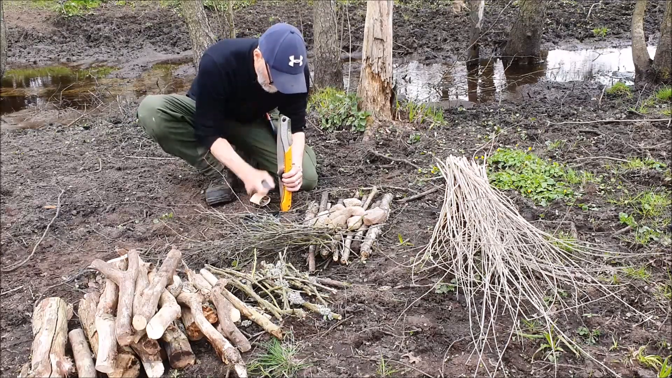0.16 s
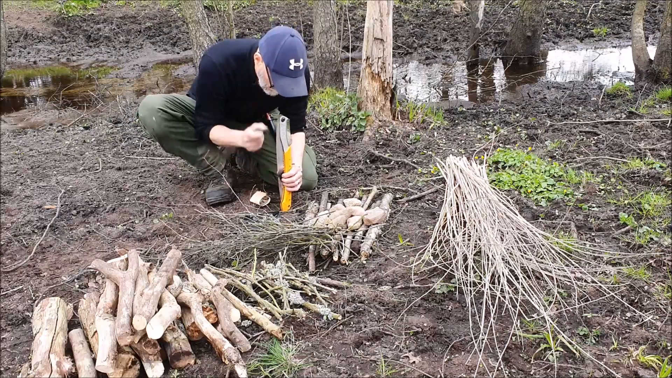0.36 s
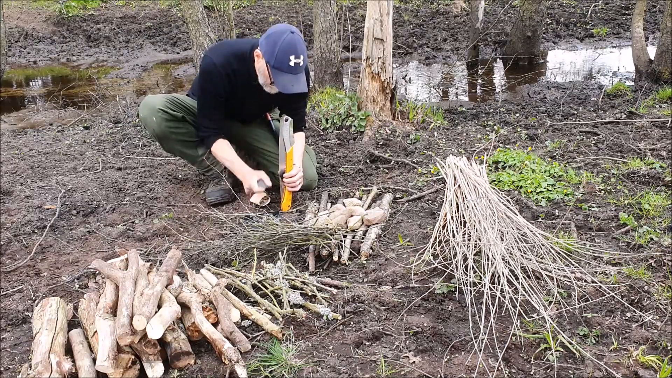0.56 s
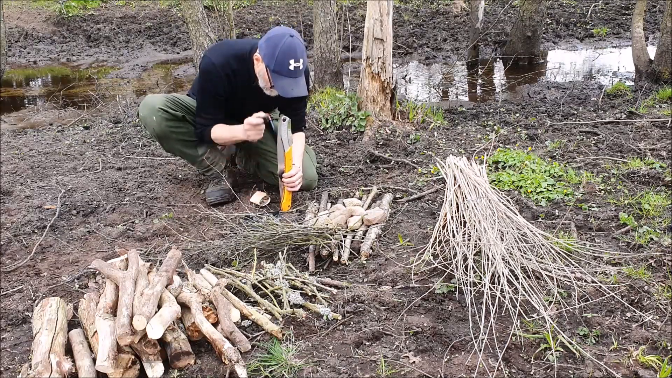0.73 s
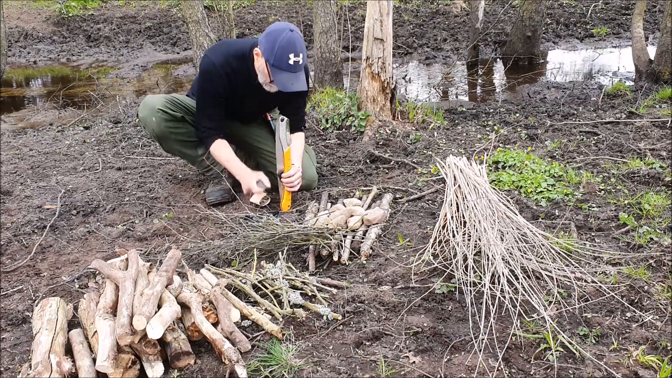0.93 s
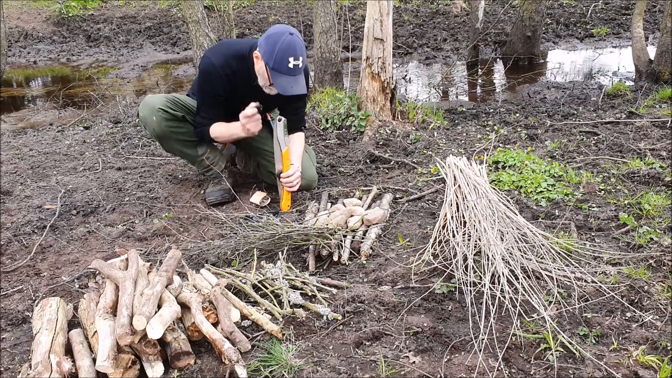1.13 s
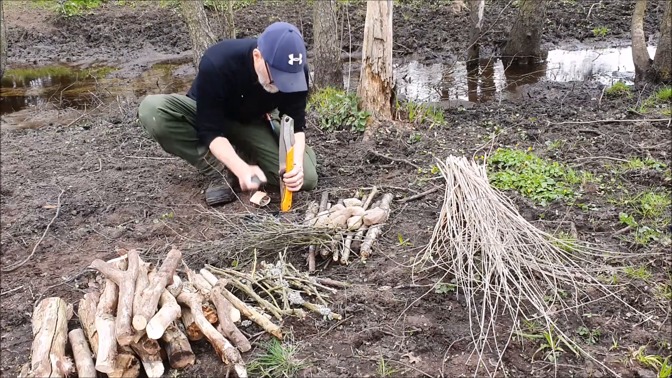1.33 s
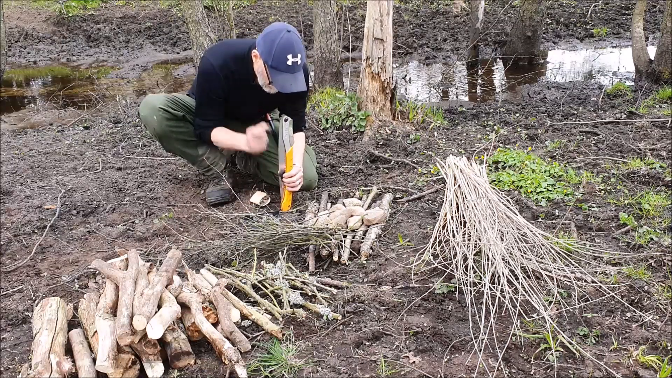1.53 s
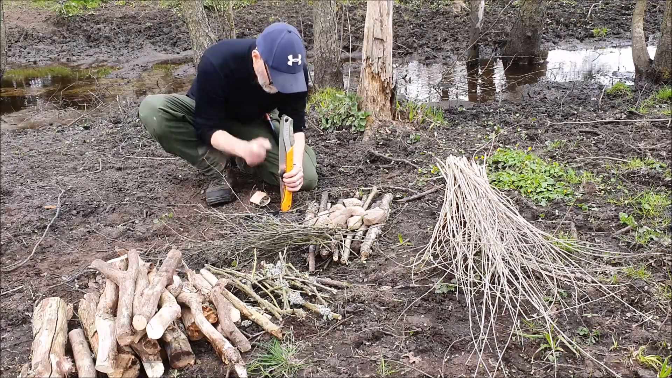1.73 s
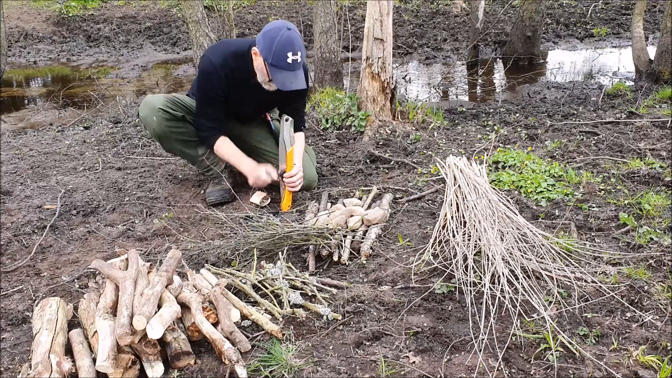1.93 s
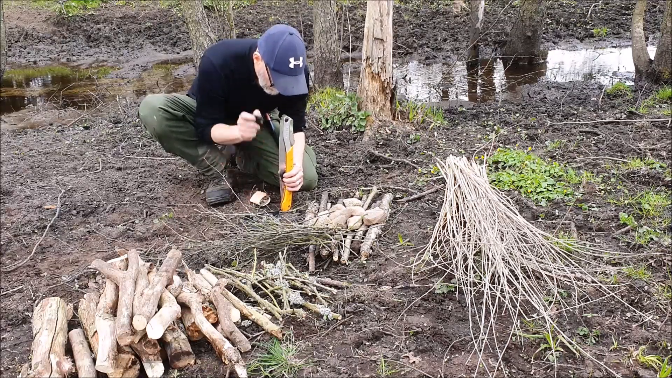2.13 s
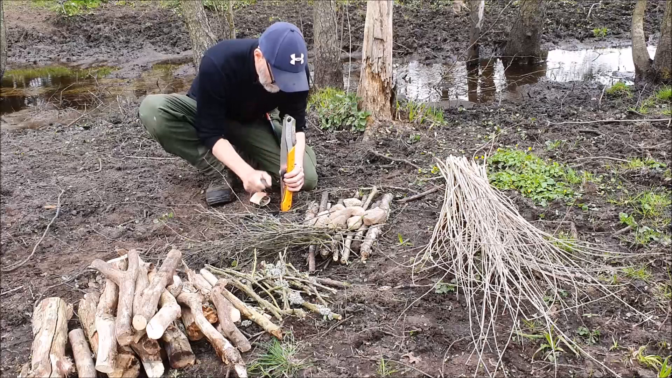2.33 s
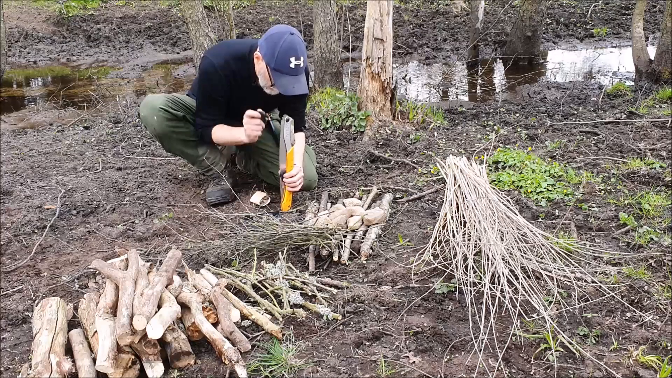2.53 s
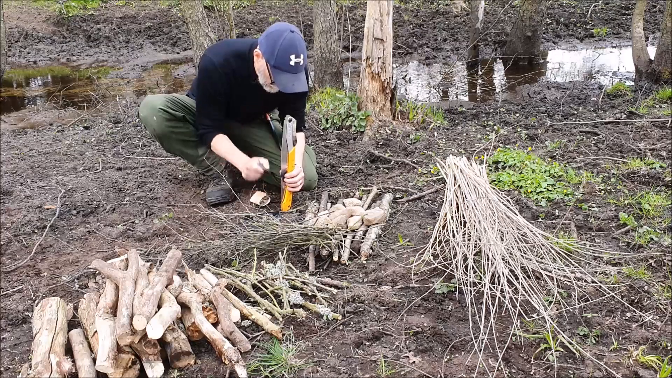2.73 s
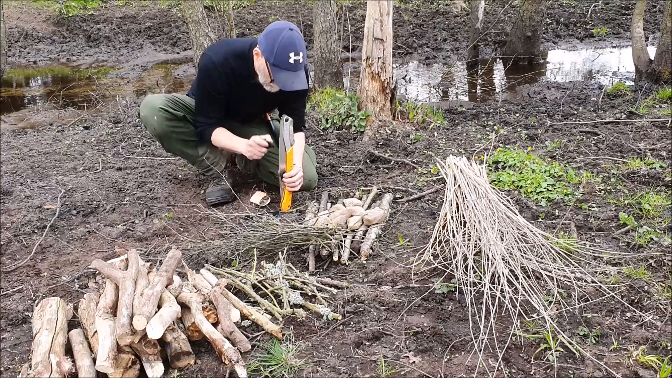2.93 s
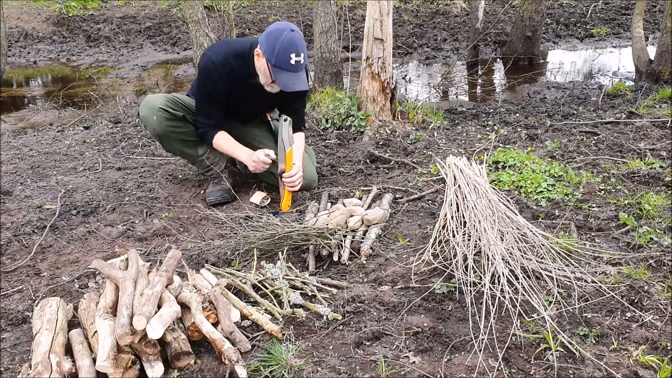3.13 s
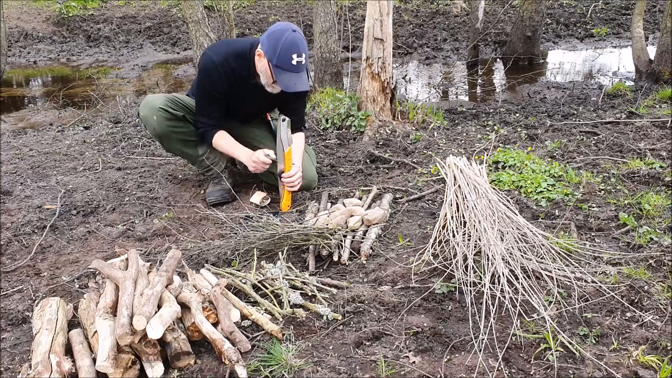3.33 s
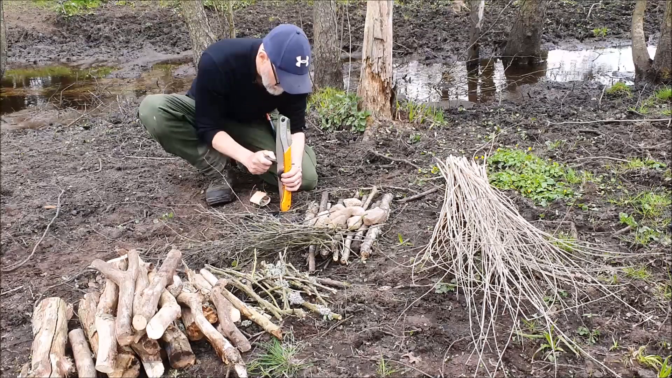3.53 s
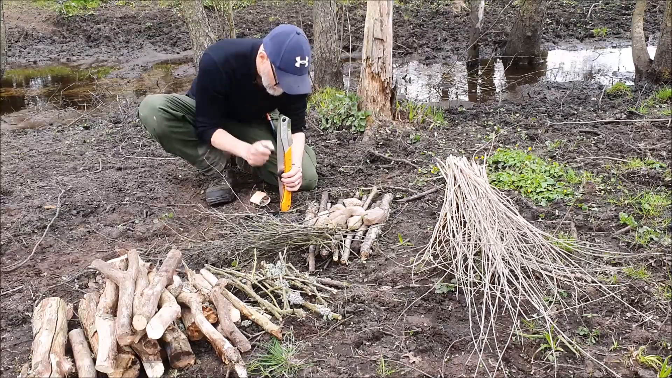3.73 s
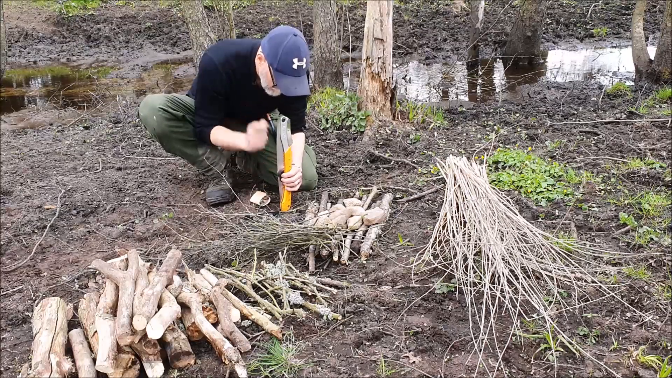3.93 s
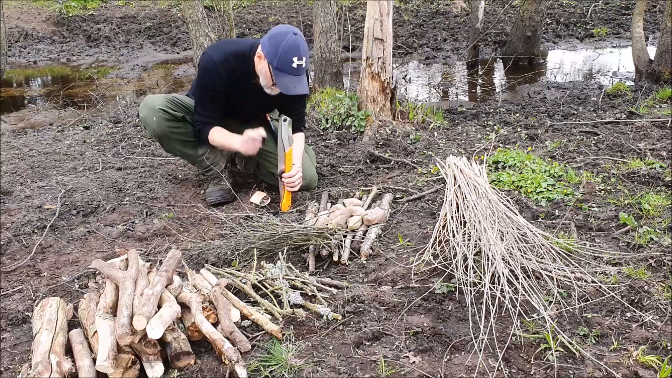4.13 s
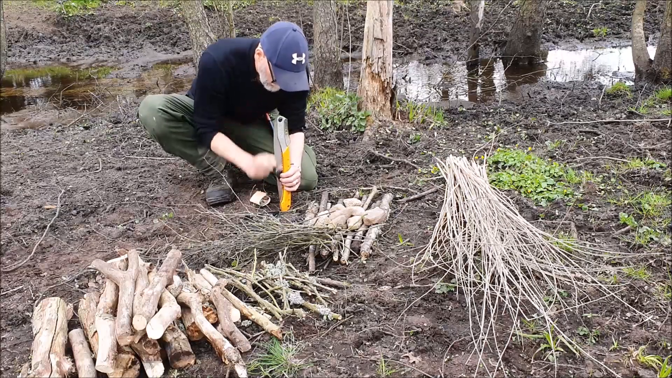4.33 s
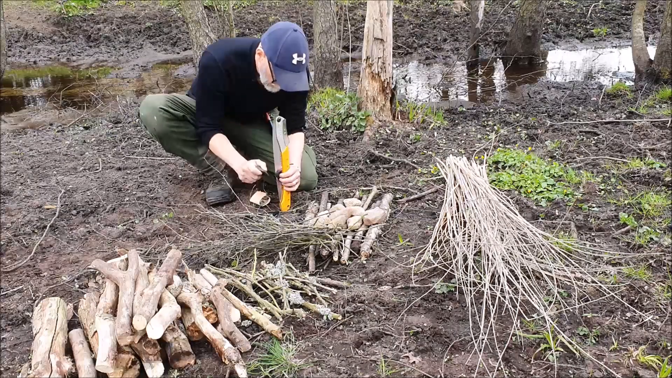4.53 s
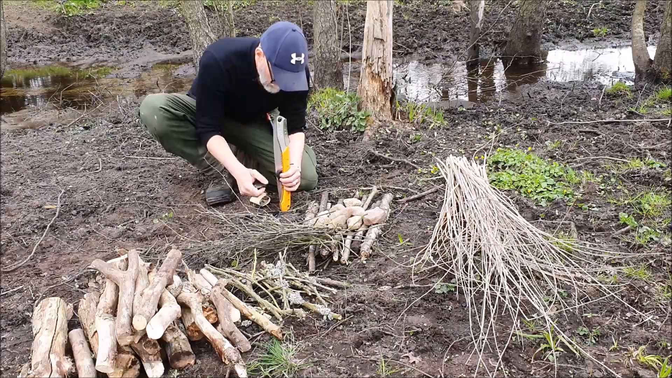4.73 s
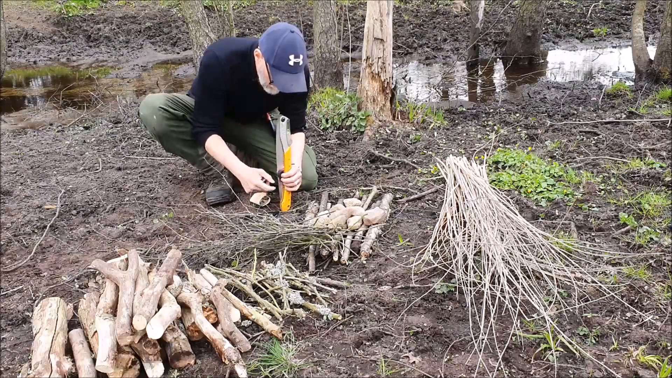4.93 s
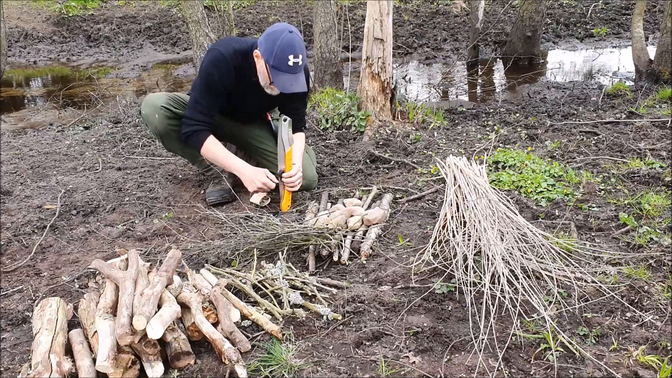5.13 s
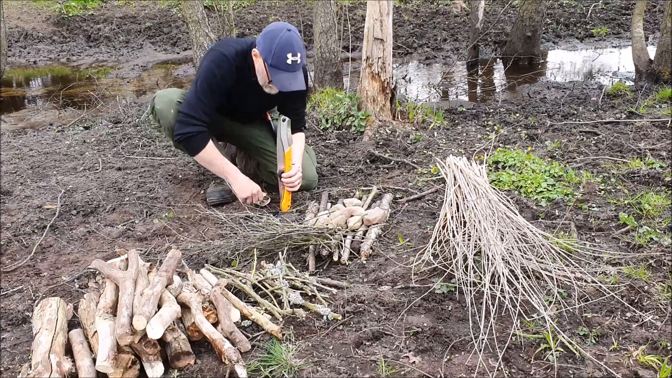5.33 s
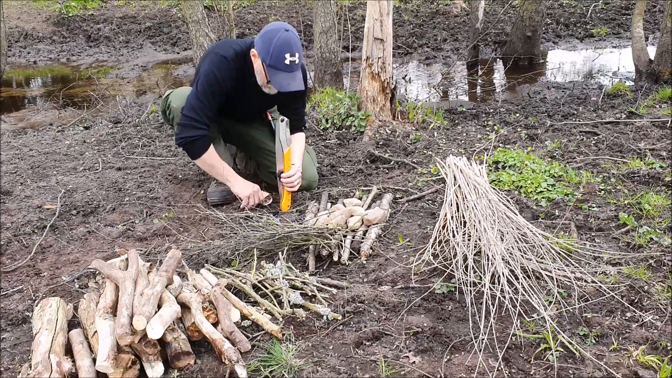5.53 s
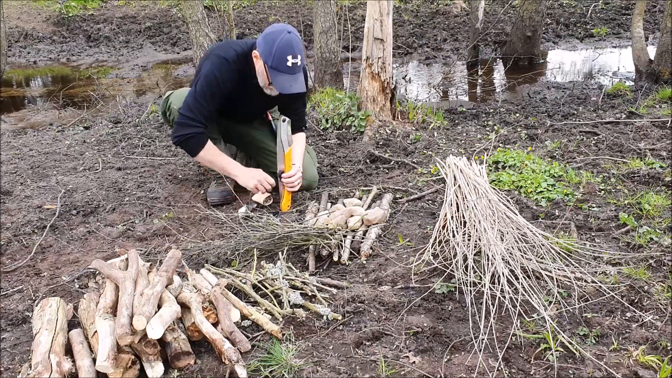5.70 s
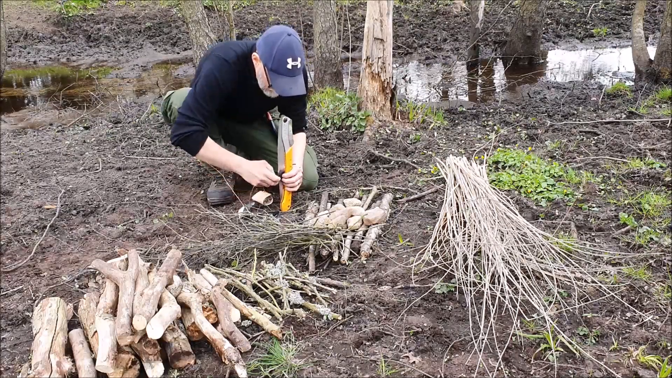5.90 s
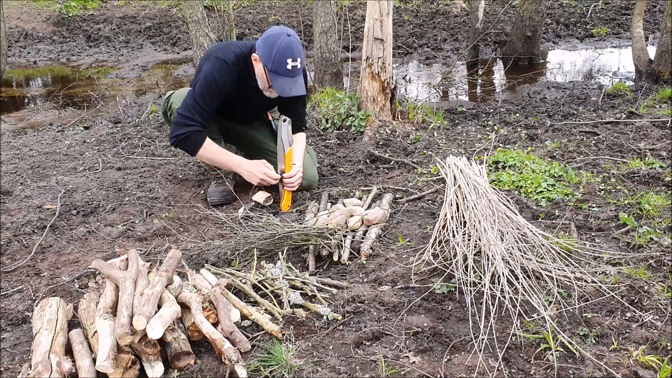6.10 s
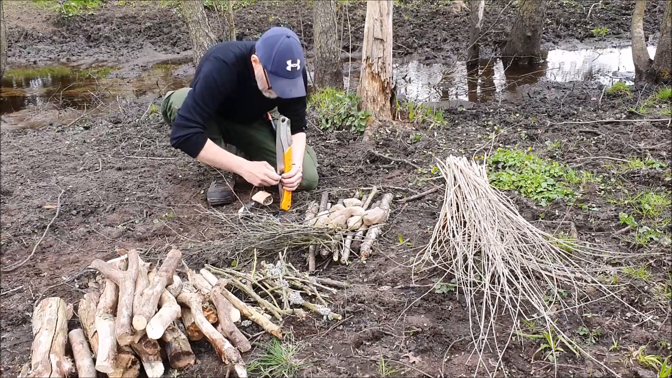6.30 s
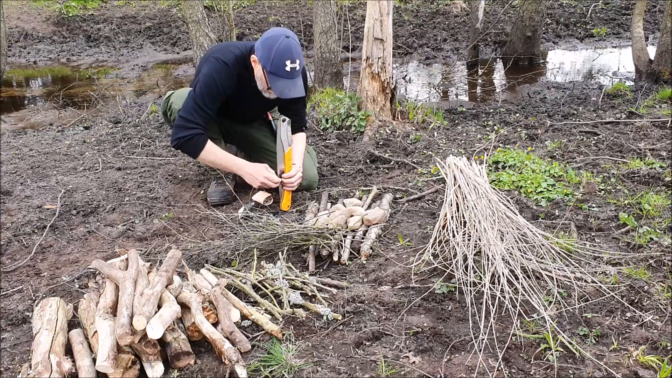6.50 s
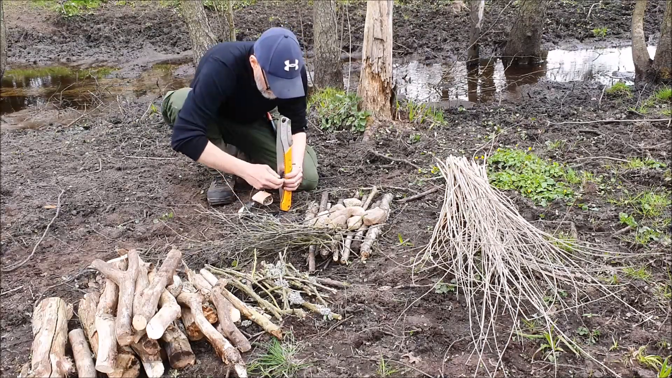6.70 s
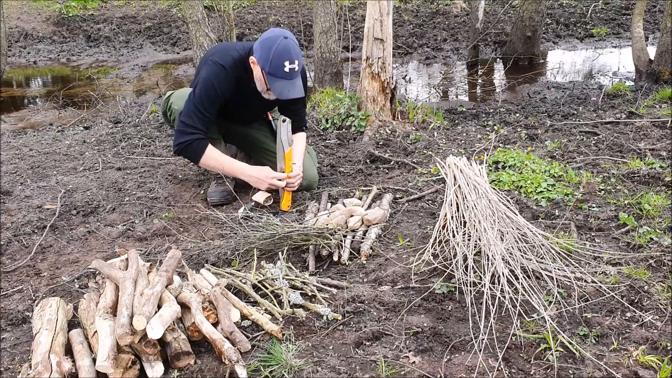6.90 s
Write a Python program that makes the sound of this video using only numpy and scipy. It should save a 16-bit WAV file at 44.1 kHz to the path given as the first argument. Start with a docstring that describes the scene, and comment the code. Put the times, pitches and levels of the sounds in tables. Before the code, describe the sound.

Close by in a wet wood, a flint is struck down a steel blade in nine short, gritty, bright scrapes, roughly three per second, each with a brief metallic ring. After a pause come two weaker strokes. A bird repeats faint rising notes early, distant birds flutter midway, and a whistle dips and climbs twice near the end. Low rumble and distant traffic hush lie beneath, picked up by a small stereo camera a couple of metres away.

```python
"""A flint is struck down a steel blade, a couple of metres from a small stereo camera in a wet wood.
Nine gritty scrapes of filtered noise come first and two more after four seconds, each setting steel
modes (decaying sines) ringing. Trunks scatter them as noise tails. A bird repeats a rising note early on,
far birds flutter mostly midway, and a whistle dips and climbs twice near the end, all as bent sines.
Stray notes and ticks fall between; a low rumble and the hush of distant traffic, both noise, lie under all."""
import sys
import numpy as np
from scipy import signal
from scipy.fft import rfft, irfft
from scipy.io import wavfile
from scipy.ndimage import uniform_filter1d

SR = 44100
rng = np.random.default_rng(int(sys.argv[2]) if len(sys.argv) > 2 else 0)


def store_wav(level_fs):
    """Save 16-bit WAV to argv[1]."""
    pcm = np.round(np.clip(np.atleast_2d(level_fs), -1, 1) * 32767)
    wavfile.write(sys.argv[1], SR, pcm.T.astype(np.int16))


N = 311346
TIME = np.arange(N) / SR


def undb(db):
    """Turn decibels into an amplitude factor."""
    return 10 ** (np.asarray(db) / 20)


def unit(x):
    """Scale to an RMS of one."""
    return x / np.sqrt(np.mean(x ** 2))


def curve(rows):
    """Draw straight lines through rows of (time [s], values) over the whole scene."""
    s, *columns = np.transpose(rows)
    return [np.interp(TIME, s, column) for column in columns]


def colour(x, hz, db, lag=0.):
    """Filter by levels [dB] and phase lags [rad] given at a few frequencies."""
    at = np.log(np.fft.rfftfreq(x.shape[-1], 1 / SR) + 1)
    lag = np.interp(at, np.log(hz), lag + np.zeros(len(hz)))
    gain = undb(np.interp(at, np.log(hz), db))
    return irfft(rfft(x) * gain * np.exp(-1j * lag), x.shape[-1])


def band(x, lo_hz, hi_hz):
    """Pass one frequency band with gentle slopes."""
    edges = [lo_hz, min(hi_hz, SR / 2.2)]
    return signal.sosfilt(signal.butter(2, edges, "bandpass", fs=SR, output="sos"), x)


def walk(rate):
    """Wander at random: values held for 1 / rate s, then smoothed twice."""
    hold = int(SR / rate)
    steps = np.repeat(rng.standard_normal(N // hold + 1), hold)
    return 1.3 * uniform_filter1d(uniform_filter1d(steps, hold), hold)[:N]


def pan(x, db):
    """Spread a sound to two sides; db is left minus right."""
    return x * undb(np.array([db / 2, -db / 2]).reshape(2, -1))


def add(out, s, x):
    """Mix x into out from time s on."""
    i = int(s * SR)
    out[..., i:i + x.shape[-1]] += x[..., :N - i]


# strokes of the flint: (time [s], scrape level [dB], time until the stone digs deepest [ms],
#  scrape decay t60 [s], colour at 400 Hz [dB], at 1 kHz [dB], at 2 kHz [dB], at 15 kHz [dB],
#  place along the blade [about -1..1], place across it [about -1..1],
#  slant of the stone [-1..1], grip on the handle [-1..1])
STROKES = [(0.2617, -27.0, 2.1, 0.11, -5.5, 0.0, 1.5, -2.5, 0.8, 0.031, -0.77, -0.21),
           (0.602, -26, 2.1, 0.081, 3.0, 0.0, -3.5, -1.5, 0.81, 0.63, 0.95, -0.2),
           (0.9542, -26.0, 2.7, 0.075, -10.5, -4.5, 2.0, -2.5, -0.66, 0.036, -0.19, -0.74),
           (1.3338, -23.5, 1.6, 0.065, -11.5, -3.0, -0.5, 5.5, -0.047, 0.053, -0.08, 0.44),
           (1.3532, -26.0, 6.0, 0.065, -8.5, -2.5, 0.5, -3, -0.55, 0.62, -0.28, 1),
           (1.705, -30, 2.1, 0.082, 5, 2.0, -2.5, -3, -0.45, -0.046, 0.6, 0.46),
           (2.0379, -29.0, 2.1, 0.076, 5.0, 3, -3.0, -2, 0.17, -1.14, -0.07, -0.78),
           (2.382, -25.5, 3.0, 0.092, 5.5, 5.0, 0.5, -3.0, -0.12, 0.56, -0.35, -1),
           (2.7247, -22, 2.5, 0.098, 1.0, 2.0, -2.0, 6.5, 0.62, -0.89, -0.65, 0.63),
           (4.0987, -31, 4.0, 0.093, 6.5, 0.5, 4, 2.0, 0.18, 0.53, -0.17, 0.85),
           (4.4543, -30.5, 9.0, 0.082, 4.0, -1.5, 0.5, -6.0, -0.22, -0.7, 0.93, 0.22)]
# the stone's edge catches within a stroke: (time [s], level [dB], chip ring [Hz])
CATCHES = [(0.2624, -30, 4600), (0.2666, -27.5, 2070), (0.2797, -40, 6340), (0.6042, -30, 5490),
           (0.9576, -30.5, 2360), (0.9597, -35, 5410), (1.334, -35, 9580), (1.3405, -37.5, 1890),
           (1.3599, -33.5, 2526), (1.708, -28.5, 6460), (2.0408, -31.5, 4980), (2.0431, -29, 2400),
           (2.3818, -27.5, 5090), (2.3882, -33.5, 2720), (2.3997, -38, 5000), (2.7275, -23.5, 5400),
           (2.7404, -34, 2625), (4.1029, -36.5, 7070), (4.1056, -29.5, 1983), (4.4643, -35.5, 6440)]
# steel mode frequencies [Hz]
STEEL_HZ = [829, 1144, 2183, 2598, 4000, 4921, 9180, 14260, 6050, 1658, 2848, 5564, 7722, 13180, 15045,
            5222]
# the same modes: (decay t60 [s], level over the scrape [dB], left minus right [dB],
#  level of the slower twin [dB])
STEEL_MODES = [(0.94, -46, 1.5, -30), (0.25, -26, 3.5, -35.5), (0.12, -10, 4, -29),
               (0.22, -27.5, 1.5, -30.5), (.22, -25, 10.5, -23), (0.17, -26.5, 4.5, -15),
               (0.1, -19.5, 4.5, -28), (0.075, -2.5, 9.5, -48), (.12, -26, 0.5, -28), (1, -44.5, 9, -26),
               (0.81, -53, -1, -34), (0.13, -35, 4.5, -21.5), (.2, -39, 6.5, -29.5), (.15, -24, 1, -27.5),
               (.07, -22, 8.5, -31.5), (.12, -24, 5, -30)]
# how each mode answers the blow at full travel: (along [dB], across [dB], slant [dB], grip [dB])
MODE_ANSWERS = [(4.0, 2.0, 1.0, 0.0), (-1.5, 4, 6.5, -2.5), (-8.0, -0.0, -3.5, 3.0), (5.0, 0.0, 4.5, -5.0),
                (-6.0, 16.0, -2.0, 1.0), (7.0, 1.0, -11.0, -8.0), (2.0, 3.0, -7.0, 1.0),
                (16.0, 1.0, -1.0, 6.0), (4.0, 3.0, 9.0, -4.0), (-1.5, 4.0, 3.0, 0.0),
                (-1.0, 5.0, -2.0, 1.0), (5.0, 0.0, -3.0, -3.0), (-2.0, 2.0, 5.0, -2.0),
                (13.0, -1.0, 4.0, 3.0), (9.0, 9.0, -0.0, 1.0), (1.0, -2.0, -0.0, -1.0)]
# the camera body shades and delays the right port: (frequency [Hz], drop [dB], phase lag [rad])
BODY_SHADE = [(300, -2.5, 1), (960, 5.5, 0.4), (4100, 3, 1.5), (8100, 4.5, 1.5), (10840, 1, 3),
              (12660, -2.5, 0.5), (14450, 11.5, -10)]
BITE_S, SIZZLE_DB = .001, -1  # rise of the contact; scrape colour at 6 kHz
BLOW, BLOW_T60_S, GRAZE = 0.65, 0.021, 0.47  # share and decay of the hard blow; share of the first touch


def strokes():
    """Stone grains scrape the blade, heard from two sides, and drive its steel modes into ringing."""
    t = TIME[:16384]
    scrape, ring = np.zeros((2, N)), np.zeros((2, N))
    hz = np.array(STEEL_HZ)[:, None]
    t60, mode_db, pan_db, twin_db = np.transpose(STEEL_MODES)[:, :, None]
    shade_hz, _, shade_lag = np.transpose(BODY_SHADE)
    lag = np.interp(hz, shade_hz, shade_lag)
    for s, db, dig_ms, scrape_t60, thud_db, knock_db, body_db, edge_db, *place in STROKES:
        colour_db = [thud_db, knock_db, body_db, SIZZLE_DB, edge_db]
        favour_db = np.dot(MODE_ANSWERS, place)[:, None]
        noise = colour(grit(len(t), spread_db=2), [400, 1000, 2000, 6000, 15000], colour_db)
        noise = banded(noise, scatter_db=3)

        # the stone grazes, digs in hard, then drags off
        dig = dig_ms / 1000
        after = np.maximum(t - dig, 0)
        bite = 1 - np.exp(-(t / BITE_S) ** 2)
        press = GRAZE + (1 - GRAZE) * np.minimum(t / dig, 1) ** 2
        drag = (undb(-60 * after / scrape_t60) + BLOW * undb(-60 * after / BLOW_T60_S)) * press
        contact = bite * drag

        # the highest treble comes mostly from the blow and dies sooner
        top = colour(noise, [12500, 14000], [-40, 0])
        fading = noise - top + top * (undb(-60 * after / .06) + 0.2)
        burst = fading * contact
        # stroke energy follows level and contact, whatever the colour and chance grain
        add(scrape, s, burst * np.linalg.norm(contact) / np.linalg.norm(burst[0]) * undb(db))

        # the modes fill up while the stone drags, and waver in the hand
        fill = 1 - np.exp(-t / (.002 + dig))
        waver_hz = rng.uniform(15, 60, hz.shape)
        waver_db = 2 * np.sin(2 * np.pi * (waver_hz * t + rng.random(hz.shape)))
        decay = undb(-60 * t / t60) + undb(twin_db + waver_db - 26 * t / t60)
        size = fill * undb(db + mode_db + favour_db + waver_db) * decay
        turn = 2 * np.pi * (hz * t + rng.random(hz.shape))
        left = (size * np.sin(turn)).sum(0)
        right = (size * undb(-pan_db) * np.sin(turn - lag)).sum(0)
        add(ring, s, np.array([left, right]))
    for s, db, chip_hz in CATCHES:
        tone = 1.1 * np.sin(2 * np.pi * (chip_hz * t[:128] + rng.random()))
        chip = unit(grit(128, spread_db=1)) + tone
        add(scrape, s - 64 / SR, chip * undb(db) * np.hanning(128))
    return scrape, ring


# scrape colour at the left port: (frequency [Hz], level [dB])
GRIT_COLOUR = [(150, -28), (400, -19.5), (1000, -9.5), (2000, 1.5), (3500, -3.5), (5200, -0.5), (8200, -7),
               (10000, 2), (12300, -6), (13500, -6.5), (15300, 13.5), (15700, 5.5), (16000, -16.5),
               (17000, -18.5)]


def grit(size, spread_db):
    """Dense stone grains on steel, uneven in strength every 32 samples, radiate to two sides."""
    grip = np.clip(rng.standard_normal(size // 32 + 1), -1.5, 1.5)
    grains = rng.standard_normal((2, size)) * undb(spread_db * np.repeat(grip, 32)[:size])
    return colour(unit(grains), *np.transpose(GRIT_COLOUR))


# bands that lift the scrape: (centre [Hz], width [Hz], lift before chance scatter [dB])
SCRAPE_BANDS = [(1350, 200, 3.5), (2263, 180, 5), (2920, 340, 5.5), (3570, 260, 4), (4870, 190, 3),
                (5560, 760, 6), (6850, 250, 3), (7240, 150, 9.5), (7720, 140, 6.5), (8960, 300, 4.5),
                (11700, 59, 1.5), (13900, 180, 6)]


def banded(x, scatter_db):
    """Lift the scrape in fixed bands, each by its own amount in every stroke."""
    hz, width, db = np.transpose(SCRAPE_BANDS)[:, :, None]
    db = db + scatter_db * rng.standard_normal(db.shape)
    at = np.fft.rfftfreq(x.shape[-1], 1 / SR)
    lift_db = (db / (1 + (2 * (at - hz) / width) ** 2)).sum(0)
    return irfft(rfft(x) * undb(lift_db - 5), x.shape[-1])


def ports(near, aside):
    """The right port hears a nearby source shaded by the body and from a slightly other side."""
    hz, db, lag = np.transpose(BODY_SHADE)
    return np.array([near, colour(near + .45 * aside, hz, -db, lag)])


# small chips and twigs tick: (time [s], relative level [dB], centre [Hz])
TICKS = [(2.1429, -50, 11800), (2.7, -67.5, 13480), (4.1445, -52, 13600), (5.111, -74, 8980),
         (5.599, -69.5, 8920), (6.376, -66, 5580)]


def ticks():
    """Chips and twigs snap: millisecond bursts of band-passed noise."""
    out, t = np.zeros(N), TIME[:256]
    for s, db, hz in TICKS:
        snap = rng.standard_normal(256) * np.exp(-((t - .001) / 0.00061) ** 2)
        add(out, s - .001, undb(db) * 2 * band(snap, hz / 1.6, hz * 1.5))
    return out


# one bird repeats a rising note: (time [s], relative level [dB])
RISES = [(1.17, -74.5), (1.372, -75), (1.581, -72), (1.785, -73), (1.985, -78.5), (2.199, -76.5)]
# its shape: (length [s], start [Hz], middle [Hz], end [Hz], left minus right [dB])
RISE = (.092, 4900, 5620, 5950, 12)
# a quick down-and-up chip before some of the rises: (time [s], relative level [dB])
CHIPS = [(1.13, -75), (1.533, -72), (1.935, -70), (2.147, -72)]
# its shape: (length [s], start [Hz], middle [Hz], end [Hz], left minus right [dB])
CHIP = (.03, 4700, 3700, 4400, 14)
# other short notes: (time [s], length [s], start [Hz], middle [Hz], end [Hz],
#  relative level [dB], left minus right [dB])
NOTES = [(0.2, 0.05, 3600, 4050, 4000, -70.5, 7), (6.8, .25, 2320, 1600, 1900, -85, 0),
         (3.3, .1, 2330, 2280, 2000, -77.5, 3), (1.266, 0.05, 4420, 4770, 4570, -73, 15),
         (6.105, 0.044, 4100, 4210, 4070, -80.5, 16), (6.114, 0.123, 4000, 4050, 4070, -62.5, 15.5),
         (6.647, 0.084, 430, 404, 395, -75, -2), (6.892, .088, 6380, 6290, 6160, -81, -8),
         (6.964, 0.05, 7250, 7140, 6920, -85, 4)]


def notes():
    """Near-sine notes whose pitch bends through three points with a slight flutter, loudest late."""
    out = np.zeros((2, N))
    flutter = .005 * walk(300)
    calls = []
    for rows, (length, *bend_hz, pan_db) in ((RISES, RISE), (CHIPS, CHIP)):
        calls += [(s, length, *bend_hz, db, pan_db) for s, db in rows]
    for s, length, hz0, hz1, hz2, db, pan_db in calls + list(NOTES):
        u = np.arange(int(length * SR)) / (length * SR)
        bend = np.polyval(np.polyfit([0, .5, 1], [hz0, hz1, hz2], 2), u)
        hz = bend * (1 + flutter[int(s * SR):][:len(u)])
        swell = np.sin(np.pi * u ** 1.7)
        voice = np.sin(2 * np.pi * np.cumsum(hz) / SR)
        add(out, s, pan(undb(db) * swell * voice, pan_db))
    return out


# a whistled syllable that dips and climbs back: (time after its start [s], pitch [Hz], relative level [dB])
SYLLABLE = [(0, 3870, -84), (.04, 3080, -73), (.12, 3050, -72), (.15, 3500, -76), (.175, 4040, -67),
            (.2, 3890, -80), (.23, 3750, -91)]
# when it is sung: (time [s], added level [dB])
SYLLABLES = [(6.301, 0.45), (6.535, -0.42)]
SYLLABLE_PAN_DB = 8  # left minus right


def phrase():
    """A whistle that is purest on top and burry in its low dips, by wider pitch wander."""
    rows = [(s + after, hz, db + more_db) for s, more_db in SYLLABLES for after, hz, db in SYLLABLE]
    hz, db = curve(rows)
    sounding = 1. * (TIME > rows[0][0]) * (TIME < rows[-1][0])
    singing = uniform_filter1d(sounding, size=441)
    burr = .008 + .045 * np.clip((3950 - hz) / 800, 0, 1)
    voice = np.sqrt(2) * np.sin(2 * np.pi * np.cumsum(hz * (1 + burr * walk(450))) / SR)
    return pan(singing * voice * undb(db + 3.2 * walk(40)), SYLLABLE_PAN_DB)


# far birds: (time [s], length [s], centre [Hz], level before the trees [dB])
CHORUS = [(0.0, 0.034, 2911, -77), (3.1, .2, 3302, -82), (3.34, .25, 2980, -77.5), (3.66, 0.048, 3000, -72),
          (3.77, 0.15, 2934, -73.5), (3.99, .08, 2935, -74), (4.2, 0.11, 2960, -70.5),
          (4.33, 0.08, 3022, -68), (4.64, 0.24, 2804, -72.5), (4.89, .17, 2965, -70),
          (5.1, 0.0686, 2627, -72.5), (5.2, 0.11, 2763, -86), (5.44, 0.051, 3014, -68),
          (5.54, 0.075, 3066, -66), (5.65, 0.066, 2967, -72), (5.76, 0.075, 2980, -84)]


def chorus():
    """Far birds: five fluttering whistles sound together in bursts, heard only through the trees."""
    voices, size = 0, np.zeros(N)
    centre_hz = curve([(s + length / 2, hz) for s, length, hz, db in CHORUS])[0]
    for s, length, hz, db in CHORUS:
        add(size, s, undb(db) * signal.windows.tukey(int(length * SR), .5))
    for ratio in (.86, .94, 1, 1.05, 1.16):
        hz = ratio * centre_hz * (1 + .06 * walk(110))
        voices = voices + np.sin(2 * np.pi * np.cumsum(hz) / SR) * undb(3 * walk(25))
    return wood(unit(voices) * size, wet_db=-2)


# scatter from the trunks: (centre [Hz], relative level [dB], decay t60 [s])
TRUNKS = [(490, -13, .35), (1000, -29.5, 0.43), (2020, -29.5, 0.33), (3970, -26, 0.4), (8000, -13, 0.11),
          (14000, -22, 0.25)]


def wood(x, wet_db):
    """Trunks scatter sound diffusely, unrelated left and right, building up over tens of milliseconds."""
    t = TIME[:SR // 2]
    tail = 0
    for hz, db, t60 in TRUNKS:
        noise = rng.standard_normal((2, len(t)))
        tail = tail + undb(db - 60 * t / t60) * band(noise, hz / 1.6, hz * 1.8)
    tail = tail * (1 - np.exp(-t / 0.035)) * undb(wet_db)
    return signal.fftconvolve(x[None], tail, axes=1)[:, :N]


# the rumble rises and falls: (time [s], level before colour [dB])
RUMBLE_LEVEL = [(0.0, -61), (2.1, -60.5), (2.16, -67.5), (3.01, -56), (3.09, -71), (3.42, -57.5),
                (3.6, -69), (3.8, -58), (4.31, -75), (4.33, -61.5), (6.41, -65.5), (6.63, -55.5),
                (6.7, -73.5), (6.88, -56.5), (7.0, -80.5), (7.06, -65.5)]


def rumble():
    """A narrow band of low noise throbs by chance under a drawn level, nearly alike at both ports."""
    mid, side = band(rng.standard_normal((2, N)), 46, 72)
    mid = mid / np.sqrt(uniform_filter1d(mid ** 2, size=SR // 2))
    both = mid + 0.19 * unit(side) * np.array([[1], [-1]])
    both = both * undb(curve(RUMBLE_LEVEL)[0])
    return pan(colour(both, [22, 33.0, 44.7, 65.3, 72, 91], [-6, -9, -2.5, 4, -6, 3.5]), -1.5)


# swell of the road below the hiss: (time [s], relative level [dB])
ROAD_LEVEL = [(0, -70), (3.5, -70.5), (7.06, -69)]
# colour of road and air: (frequency [Hz], relative level [dB])
HUSH_COLOUR = [(100, 5), (140, 12.5), (200, 7), (300, 3), (560, -3.5), (900, 6), (1250, -1), (1700, 1),
               (2100, -6.5), (3000, -6), (4100, -6), (4700, -18), (5500, -22), (9000, -25), (11500, -21),
               (14500, -21.5), (15700, -27), (15900, -54)]


def hush():
    """Distant road and air as coloured noise: alike in the bass, slightly opposed above."""
    hz, db = np.transpose(HUSH_COLOUR)
    mid, side = rng.standard_normal((2, N))
    mid = colour(mid, hz, db)
    side = colour(colour(side, hz, db), [100, 300, 700, 8000], [-7, -2.5, 1.0, 0.1])
    both = band(np.array([mid + side, mid - side]), 88, 20000)
    # the road swells gently below, the air hiss above stays nearly even
    air = colour(both, [3000, 5000], [-40, 0])
    road = both - air
    return road * undb(curve(ROAD_LEVEL)[0]) + air * undb(-65.5 + 0.54 * walk(21))


def scene():
    """Mix the blade, the birds and their scatter over the background."""
    scrape, ring = strokes()
    short_notes, whistle = notes(), phrase()
    blade = colour(scrape[0] + 0.45 * ring[0], [13000, 14200], [0, -10])
    echoes = wood(blade, wet_db=-21.5)
    echoes = echoes + wood(short_notes.sum(0), wet_db=-11.5) + wood(whistle.sum(0), wet_db=-9)
    struck = ports(scrape[0] + ticks(), scrape[1]) + ring
    birds = 0.77 * (short_notes + whistle)
    return struck + birds + echoes + chorus() + rumble() + hush()


TOP_HZ = 16300


def record(dry):
    """The camera cuts the top steeply."""
    return signal.sosfilt(signal.ellip(8, .2, 70, TOP_HZ, fs=SR, output="sos"), dry)


dry = scene()
out = record(dry)
store_wav(out)
```